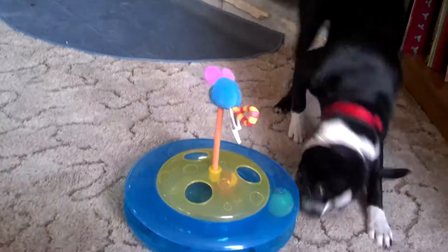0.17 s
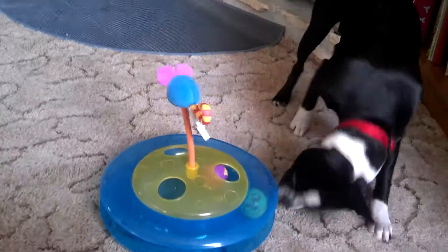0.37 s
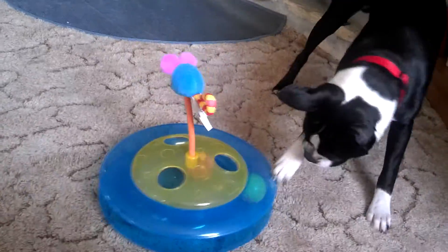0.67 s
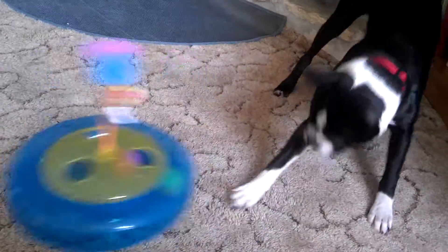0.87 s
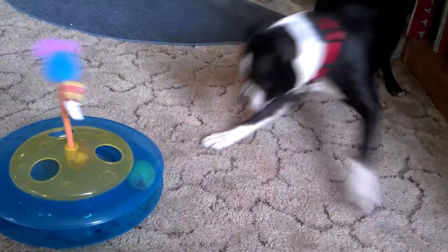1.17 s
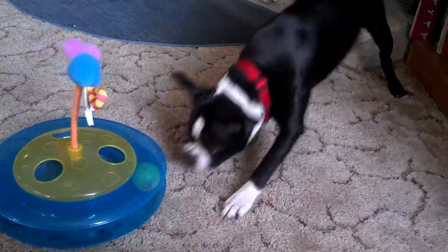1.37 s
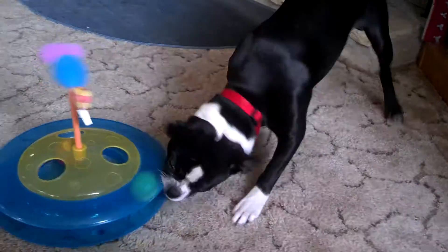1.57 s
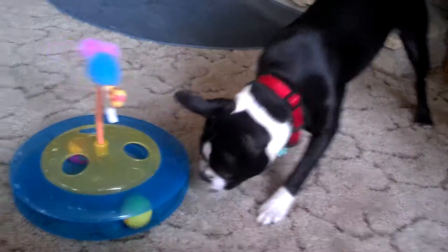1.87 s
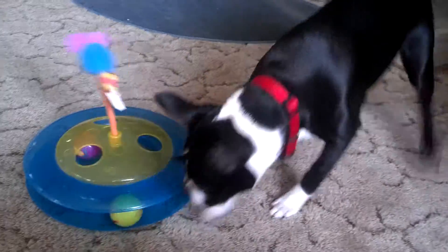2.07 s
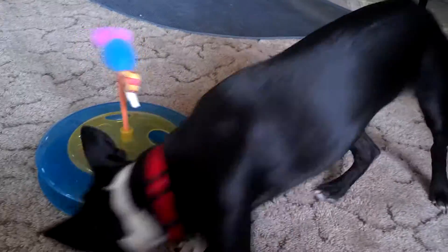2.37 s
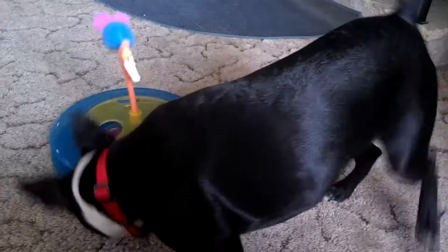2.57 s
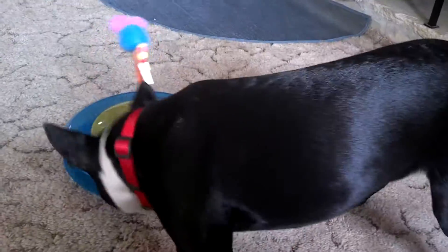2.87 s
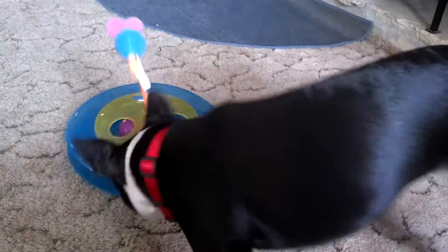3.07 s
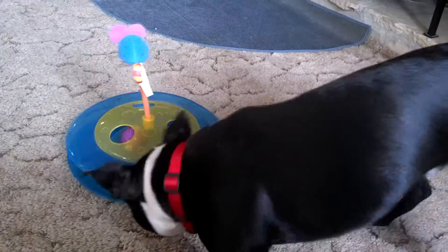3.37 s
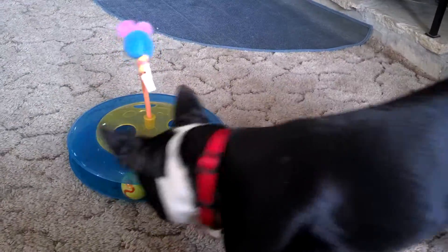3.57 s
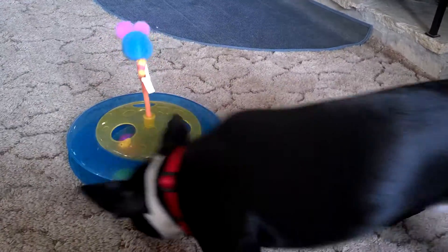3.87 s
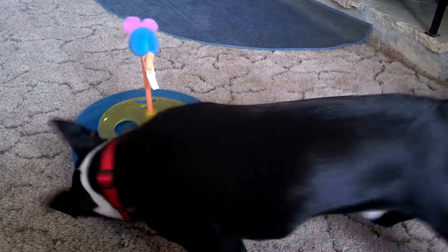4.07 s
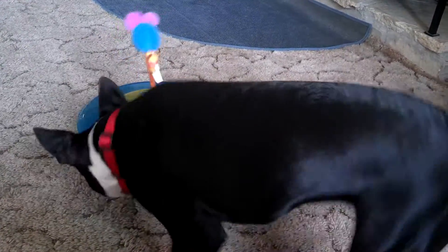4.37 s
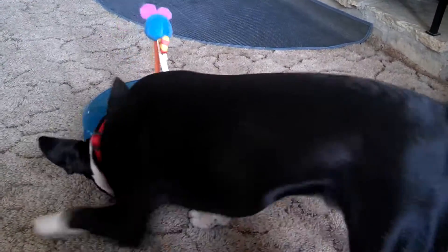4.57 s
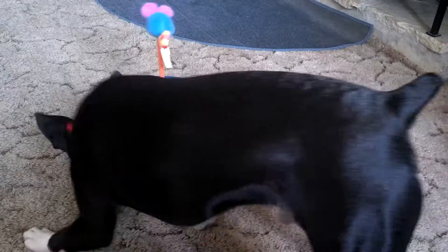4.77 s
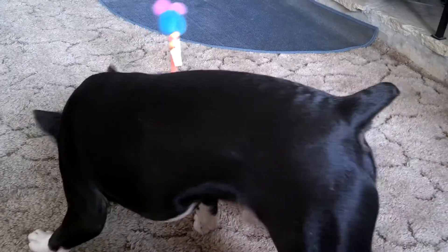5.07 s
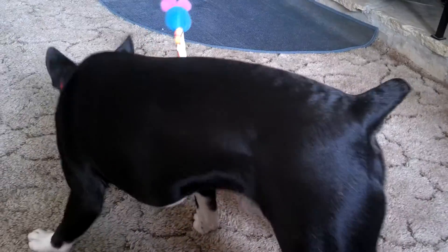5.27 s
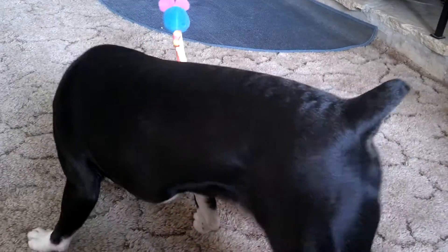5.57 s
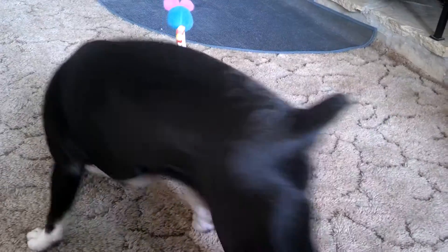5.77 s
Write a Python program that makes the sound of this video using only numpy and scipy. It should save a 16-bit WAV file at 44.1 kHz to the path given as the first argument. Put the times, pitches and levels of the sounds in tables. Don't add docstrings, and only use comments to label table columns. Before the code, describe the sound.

Hollow plastic clacks and short ball rumbles mix with bright collar tag jingles and light sniffs as a dog plays indoors.

```python
import sys
import numpy as np
from scipy import signal
from scipy.fft import rfft, irfft
from scipy.io import wavfile
from scipy.ndimage import uniform_filter1d

SR = 44100
rng = np.random.default_rng(int(sys.argv[2]) if len(sys.argv) > 2 else 0)


def boost(x):
    u = np.asarray(x, float) / 20
    return 10 ** u


def store_wav(level_fs):
    pcm = np.round(np.clip(np.atleast_2d(level_fs), -1, 1) * 32767)
    wavfile.write(sys.argv[1], SR, pcm.T.astype(np.int16))


N = 260631
FREQS = np.fft.rfftfreq(N, 1 / SR) + 1


def curve(table):
    s, *columns = np.transpose(table)
    return [np.interp(np.arange(N) / SR, s, c) for c in columns]


def over_hz(points):
    hz, value = np.transpose(points)
    return np.interp(np.log(FREQS), np.log(hz), value)


def walk(rate):
    hold = int(SR / rate)
    steps = np.repeat(rng.standard_normal(N // hold + 1), hold)
    return 1.25 * uniform_filter1d(steps, hold)[:N]


def rustle(points, grit_db, rate, patchy_db):
    grain_db = grit_db * rng.exponential(size=N)
    grains = rng.standard_normal(N) * boost(grain_db + patchy_db * walk(rate))
    x = irfft(rfft(grains) * boost(over_hz(points)), N)
    return x / np.std(x)


def ring(hz, db, t60, phase, rise):
    t = np.arange(SR // 4)[:, None] / SR
    decay = boost(db - 60 * t / np.clip(t60, .003, .5))
    modes = decay * (1 - np.exp(-t / rise)) * np.sin(2 * np.pi * hz * t + phase)
    return modes.sum(axis=1)


def burst(count, lo_hz, hi_hz):
    band = signal.butter(2, [lo_hz, hi_hz], "band", fs=SR, output="sos")
    return signal.sosfilt(band, rng.standard_normal((count, SR // 4)))


def add(track, s, sound):
    i = int(s * SR)
    track[i:i + len(sound)] += sound[:N - i]


def mains_hum():
    # time_s, level_db
    hum_level = [
        (0.0, -58),
        (0.26, -53.5),
        (1.45, -79),
        (3.08, -59.5),
        (3.24, -66),
        (3.47, -60),
        (5.91, -53.5),
    ]
    tone = np.sin(2 * np.pi * 119.5 * np.arange(N) / SR + 1.2 * walk(40))
    return tone * boost(curve(hum_level)[0] + 10 + 3.0 * walk(35))


def scuffing():
    # time_s, rumble_db
    push = [(0, -57.5), (.2, -51.5), (.5, -53), (.66, -62.5), (.8, -52), (1.02, -70), (1.22, -72.5),
            (1.6, -71.5), (1.97, -65.5), (2.43, -59.5), (2.63, -55.5), (2.78, -58), (3.11, -61.5),
            (3.57, -56), (3.85, -59.5), (4.23, -53.5), (5.55, -53), (5.91, -55.5)]
    # time_s, fur_hiss_db
    stir = [(0, -73), (.39, -57.5), (.52, -58), (.66, -81.5), (.79, -77.5), (1.1, -97), (1.33, -69),
            (1.51, -86), (1.97, -77.5), (2.43, -69), (2.75, -66.5), (3.11, -75), (3.6, -72.5), (4.08, -66),
            (5.2, -68), (5.33, -73), (5.68, -64), (5.91, -64.5)]
    # time_s, peak_db
    runs = [
        (0.519, -53.5),
        (0.869, -46.5),
        (2.632, -51),
        (4.23, -47.5),
        (4.54, -52),
        (5.199, -43),
        (5.55, -59.5),
    ]
    # frequency_hz, density_db
    rumble_colour = [(40, -4.5), (100, -2.5), (200, 1.5), (330, 2.5), (550, 0), (1100, -5.5), (2000, -13.5),
                     (3000, -33)]
    scrape_colour = [(1200, -28), (2200, 0.5), (3500, -2.5), (5000, -6), (7000, -12), (9000, -11),
                     (12000, -14), (16000, -23)]
    fur_colour = [(5000, -52), (7500, -9), (9000, -7.5), (11400, -0.5), (13000, -8.5), (15500, 1.5),
                  (17000, -40.5)]
    rise_db_s, fade_db_s = 125, 119.5
    t = np.arange(N) / SR
    (push_db,), (fur_db,) = curve(push), curve(stir)
    rolls = sum(boost(db - np.maximum(rise_db_s * (s - t), fade_db_s * (t - s))) for s, db in runs)
    rumble_level = np.hypot(boost(push_db - 1.5), rolls)
    rumble = rumble_level * rustle(rumble_colour, grit_db=2.5, rate=24, patchy_db=0.0)
    scrape_db = -70.5 + 0.9 * (push_db + 59)
    scrape = boost(scrape_db + 3) * rustle(scrape_colour, grit_db=1.5, rate=50, patchy_db=.8)
    fur = boost(fur_db + 1.5) * rustle(fur_colour, grit_db=1.5, rate=60, patchy_db=.8)
    return rumble + scrape + fur


def jingles():
    # time_s, tick_peak_db, ring_re_tick_db
    low_tag = [(.397, -42.5, 5), (1.479, -48, 0), (1.488, -53, 9), (2.0842, -43.5, -5), (3.009, -31.5, 7.5),
               (3.3705, -57, -11), (3.6736, -51, -8), (4.369, -39.5, -8), (4.3764, -41, -14),
               (4.415, -47, 0.5), (4.6616, -45.5, -6), (4.7314, -44.5, 6)]
    middle_tag = [(.501, -53, 17), (0.9466, -60, -10.5), (1.2416, -65.5, -7), (1.3152, -52.5, -6),
                  (1.5253, -45.5, -12), (1.793, -62, -8), (2.188, -62, 3), (2.2872, -57, -3),
                  (2.5038, -51, 0), (2.5122, -49, -1.5), (2.6195, -54.5, 7.5), (3.075, -36, -6),
                  (3.8464, -52, 2), (4.119, -31, -15), (4.4395, -47.5, 5), (4.4777, -64, 17.5),
                  (4.4929, -51.5, 11.5), (4.6952, -43, 3.5), (5.1765, -41, -9), (5.477, -54, 5),
                  (5.593, -41.5, 8), (4.7435, -56, 6), (5.601, -41, 13), (5.6096, -38.5, 2.5),
                  (5.7014, -48.5, 12)]
    high_tag = [(0.182, -43, 4.5), (0.3012, -30, -8), (0.3242, -27, -5), (0.4121, -36, -5),
                (0.548, -48, 15), (.749, -41.5, 1), (0.9365, -47, 1.5), (1.2944, -62, -4), (2.431, -46, -2),
                (2.74, -51, 11.5), (2.756, -56.5, 7), (2.995, -35, 6), (3.6894, -57.5, 17),
                (3.7425, -60.5, 25.5), (4.0798, -33, -31), (4.1355, -39, -2), (5.2958, -41.5, -6),
                (5.4936, -48.5, 10), (5.541, -43.5, 6), (5.55, -56, 17), (5.6887, -49.5, 3),
                (5.7615, -52, -7), (5.79, -38, 8), (5.8683, -50, 0), (5.7821, -33, -4)]
    # low_db, middle_db, high_db
    tags_along = [(-3, -16, -20), (-18, 3, -19), (-20, -18, 0)]
    # time_s, peak_db
    dry_ticks = [(0.2635, -27), (0.466, -36), (0.5649, -25), (0.6924, -28.5), (.7644, -32), (0.7867, -30.5),
                 (0.8032, -17), (0.817, -52), (.927, -61.5), (1.176, -66), (1.5855, -49), (1.6075, -57),
                 (1.546, -50), (1.5736, -56.5), (1.62, -54), (1.595, -38), (1.7091, -50.5), (2.776, -56),
                 (2.788, -39.5), (2.9396, -36), (3.346, -47.5), (3.384, -54), (4.6132, -51),
                 (4.9113, -47.5), (5.28, -38.5), (5.6839, -43.5)]
    dry_ring_db = -26.5
    hits = [(s, db, *[dry_ring_db] * 3) for s, db in dry_ticks]
    for tag, along in zip((low_tag, middle_tag, high_tag), tags_along):
        hits += [(s, db, *(ring_db + np.array(along))) for s, db, ring_db in tag]
    return sorted(hits)


def clinks():
    # frequency_hz, level_db, t60_s
    tag_modes = [(11350, 0, .035), (13065, -2, .048), (15270, -4, .04)]
    # frequency_hz, level_db, t60_s
    weak_modes = [(6300, -57, 0.059), (7200, -47, 0.014), (8190, -18, 0.054)]
    out, t = np.zeros(N), np.arange(SR // 4) / SR
    hz, db, t60 = np.transpose(tag_modes)
    weak_hz, weak_db, weak_t60 = np.transpose(weak_modes)
    hits = jingles()
    chance = rng.standard_normal((len(hits), 3 + len(weak_modes)))
    snaps, chatters = burst(len(hits), 7600, 21000), burst(len(hits), 36, 400)
    fast = (1 - np.exp(-t / 0.00095)) * boost(-60 * t / 0.0068)
    slow = boost(-60 * t / 0.087)
    for (s, peak_db, *tag_db), luck, snap, chatter in zip(hits, chance, snaps, chatters):
        tag_db = np.array(tag_db)
        ringing = db + tag_db - 0.99 * np.clip(-22.0 - tag_db, 0, 30)
        tags = ring(hz * (1 + 0.0022 * luck[:3]), ringing, t60 * boost(2 * luck[3:]), luck[:3], rise=0.0017)
        tags = tags + ring(hz * 1.009, ringing - 5, 0.49 * t60, 0, rise=0.0016)
        tags = tags + ring(weak_hz, ringing.max() + weak_db + 5 * luck[3:], weak_t60, 0, rise=0.00083)
        tick = snap * (boost(11.5) * fast + boost(-9.5) * slow)
        add(out, s, boost(peak_db + 1.5) * (tags * (1 + 0.9 * chatter) + tick))
    return out


def blows():
    # time_s, peak_db, brightest_hz, tilt_db_per_octave
    rim_hits = [(.225, -27.5, 448, -3.5), (.261, -30.5, 440, -4.5), (.317, -24, 507, 11.5),
                (0.324, -19.5, 517.5, 6.5), (0.71, -31, 530, 1), (.844, -34.5, 520, -3),
                (.935, -35.5, 430, 9), (1.291, -69.5, 630, -2.5), (1.545, -38, 441, 3.5),
                (1.5947, -32, 494, 2.5), (1.619, -37, 449, 4.5), (1.726, -44.5, 418, 1),
                (2.231, -45, 573, -7.5), (2.245, -54.5, 520, -11.5), (2.451, -32, 464, -0.5),
                (2.474, -40, 510, -6), (2.794, -44.5, 503, 0), (3.099, -27, 426, -3.5),
                (3.377, -47, 467, 1), (3.619, -30, 524, 11.5), (3.656, -38, 437, -12.5),
                (4.0726, -23, 450, -2.5), (4.146, -25, 804, -9.5), (4.163, -30, 560, 2),
                (4.2356, -29, 696, -4.5), (4.393, -50.5, 637, -1.5), (4.754, -33, 458, -4),
                (5.051, -36.5, 522, -3.5), (5.298, -30, 530, -2)]
    base_hits = [(.246, -31, 345, 3.5), (0.925, -38, 313, -3.5), (1.008, -44.5, 301, 1),
                 (1.179, -66, 336, -2), (1.869, -45, 338, 1.5), (2.2, -60, 295, -9.5),
                 (2.464, -37.5, 380, -2.5), (2.969, -26.5, 379, 3), (3.059, -25, 272, -3),
                 (3.366, -41, 385, 2.5), (3.641, -30, 332, -4), (3.839, -50, 335, 9),
                 (4.052, -30, 301.6, 9), (4.348, -29, 336, -5), (4.554, -43, 302, 11.5),
                 (4.641, -34.5, 301, -8.5), (4.778, -35.5, 329, 3), (4.905, -44, 350, 1),
                 (5.083, -39, 383, 2), (5.097, -38.5, 340, 4.5), (5.897, -38.5, 350, -6)]
    claw_hits = [
        (0.298, -39.5, 540, 16),
        (.564, -49, 1135, 11),
        (0.688, -46, 1107, 14),
        (0.787, -32.5, 1270, -12),
        (0.802, -26, 1105, -5),
        (2.939, -43, 880, -3),
        (5.789, -31.5, 1410, -2),
    ]
    ball_hits = [(0.764, -26, 1366, -3), (0.774, -38.5, 1247, 2), (0.819, -29, 1434, -12.5),
                 (1.523, -43.5, 1123, 9), (1.572, -38.5, 918, 11), (1.608, -41, 1023, 1.5),
                 (1.708, -46, 950, -3.5), (1.959, -50, 976, -9), (1.992, -45, 1030, -6),
                 (2.428, -39, 970, -9.5), (2.546, -31, 886, -6.5), (2.563, -31.5, 835, -6),
                 (2.6, -47, 950, -11), (2.988, -27, 917, 2.5), (2.9964, -12, 1093, -3.5),
                 (3.02, -20, 833, -8.5), (3.425, -44.5, 1096, -2.5), (3.443, -39.5, 1062, -3.5),
                 (3.474, -45.5, 850, -7), (4.119, -20.5, 815, -2.5), (4.968, -37.5, 850, -3),
                 (5.138, -32.5, 1153, -1.5), (5.177, -22, 966, -6), (5.188, -26, 1012, -8),
                 (5.278, -29, 888, 12.5), (5.761, -23, 843, -5), (5.778, -29, 930, 10)]
    crack_levels = [-19.5, -22.5, -25, -6]
    per_tilt, per_peak = 0.44, 0.069
    hits = []
    for kind, crack_db in zip((ball_hits, rim_hits, base_hits, claw_hits), crack_levels):
        for s, db, hz, tilt in kind:
            treble_db = crack_db + per_tilt * tilt + per_peak * (db + 37.5)
            hits.append((s, db, hz, treble_db, tilt))
    return sorted(hits)


def knocks():
    # frequency_hz, level_db, t60_share (of the blow's t60)
    shell_modes = [(234.2, -5.5, 2.38), (266, -12.5, 0.73), (336, -5, 3.1), (412, -2, 1.2), (520, 5, 1.12),
                   (660.2, 5, 1.74), (830, 5.5, 0.37), (850, -0.5, 0.23), (880, 7, 0.52), (1019, 5.5, 0.77),
                   (1259, 7, 0.53), (1470, -8, 0.78), (1568, -24.5, 0.09), (1800, -17, 0.51),
                   (2016, -4.5, 0.39)]
    out, t = np.zeros(N), np.arange(SR // 4) / SR
    hz, db, share = np.transpose(shell_modes)
    hits = blows()
    chance = rng.standard_normal((len(hits), 3, len(shell_modes)))
    rattles, cracks = burst(len(hits), 230, 1500), burst(len(hits), 2055, 3250)
    for hit, (size, detune, phase), rattle, crack in zip(hits, chance, rattles, cracks):
        s, peak_db, bright_hz, treble_db, tilt_db = hit
        off_peak_db = 7.3 * np.abs(np.log2(hz / bright_hz))
        colour = db + 0.94 * size - off_peak_db + tilt_db * np.log2(hz / 600)
        blow = ring(hz * (1 + 0.058 * detune), colour, 0.031 * share, 0.41 * phase, rise=0.72 / bright_hz)
        blow = blow / np.abs(blow).max() + ring(bright_hz, -6.5, 0.032, 0, rise=0.00056)
        slap_db = -10.5 + 4.5 * np.log2(min(bright_hz / 900, 1))
        blow = blow + ring(np.array([520, 900, 1350]), slap_db, 0.017, 0, rise=0.00046)
        blow = blow + rattle * boost(5.0 + tilt_db - 60 * t / 0.033) * (1 - np.exp(-t / 0.0079))
        crack_decay = boost(treble_db + 18.0 - 60 * t / 0.013) + boost(treble_db + 0.5 - 60 * t / 0.15)
        blow = blow + crack * (1 - np.exp(-t * bright_hz / 0.12)) * crack_decay
        add(out, s + 0.002002, blow * boost(peak_db + 2.0))
    return out


def afterrings():
    # time_s, peak_db, pitch_hz, t60_s
    panels = [(.229, -34.5, 473, 0.023), (.264, -22.5, 462, .03), (.3265, -19, 511, 0.1),
              (.345, -29.5, 503, .1), (.398, -39.5, 517.7, 0.17), (.7125, -39.5, 502, 0.03),
              (1.5965, -34.5, 520, .02), (2.971, -24, 620, 0.0079), (3.033, -29.5, 806, .03),
              (3.075, -26.5, 1363, 0.022), (3.446, -35, 1013, 0.028), (3.621, -28.5, 797, 0.01),
              (3.631, -30, 1084, 0.017), (3.654, -35.5, 426, 0.039), (4.0742, -8, 801, 0.0076),
              (4.1205, -22.5, 824.6, 0.066), (4.237, -26, 926, 0.015), (.2635, -38.5, 1300, .012),
              (.24, -36, 1250, .03), (.7642, -24, 1300, .009), (.767, -29.5, 420, 0.028),
              (.7745, -31.5, 1250, 0.0098), (.787, -29.5, 1300, .02), (.8035, -18, 1250, 0.0073),
              (.806, -30, 400, .02), (.8185, -24, 1100, 0.012), (.828, -32, 1400, 0.014),
              (.846, -34.5, 500, .025), (.869, -33, 500, 0.022), (2.5465, -25, 893, 0.018),
              (2.5645, -28, 840, 0.022), (2.601, -36.5, 930, 0.017), (3.0225, -15.5, 830, 0.015),
              (3.061, -22.5, 700, 0.0085), (4.641, -31.5, 330, 0.023), (4.765, -33, 700, 0.017),
              (5.1, -39, 1050, .03), (5.141, -28.5, 1300, .01), (5.151, -38, 1200, 0.023),
              (5.198, -28.5, 1050, .015), (5.29, -32.5, 1400, .02), (2.9972, -32, 3600, .012),
              (3.0055, -34, 3500, .015), (3.621, -42, 4300, .02), (1.8715, -48, 330, .1),
              (1.993, -42, 1040, .015), (2.004, -48, 1040, .015), (2.433, -36, 800, .015),
              (.9265, -40, 1900, .01), (.3, -36, 2200, .01), (5.477, -51.5, 7360, 0.047),
              (5.595, -55, 7080, 0.075), (5.69, -62, 6720, 0.11)]
    # time_s, peak_db, t60_s
    brittle = [(0.3, -36.5, .02), (.317, -32.5, 0.033), (1.5244, -45.5, .015), (1.5458, -49.5, .03),
               (1.5743, -49.5, .02), (1.5943, -36.5, 0.018), (1.6075, -60, 0.017), (1.6194, -47, 0.014),
               (1.7101, -47.5, .015), (2.9389, -30.5, 0.014), (2.9707, -43, 0.041), (2.9979, -32.5, 0.0092),
               (3.012, -36, .3), (3.6189, -38.5, 0.034), (3.635, -54.5, 0.05), (4.1206, -52, 0.12),
               (5.1799, -46, 0.031), (5.2801, -44, .04), (5.7702, -41, 0.023), (5.782, -51.5, 0.03),
               (5.795, -46.5, 0.126)]
    out, t = np.zeros(N), np.arange(SR // 4) / SR
    for s, db, hz, t60 in panels:
        add(out, s, ring(hz, db + 2.5, t60, 0, rise=.9 / hz))
    for (s, db, t60), snap in zip(brittle, burst(len(brittle), 2600, 4200)):
        add(out, s, snap * boost(db + 10.5 - 60 * t / t60) * (1 - np.exp(-t / 0.001)))
    return out


def sniffs():
    # start_s, end_s, whistle_hz
    spans = [
        (.41, .575, 3500),
        (4.765, 4.9, 3650),
        (4.46, 4.56, 2400),
        (2.645, 2.885, 3800),
        (3.5, 3.6, 4000),
        (2.99, 3.09, 3600),
        (4.075, 4.17, 6000),
    ]
    # hiss_re_whistle_db, level_db
    levels = [(-4, -42.5), (-20.5, -61), (-19, -56), (0, -58), (5, -59.5), (-7.5, -44.5), (-6, -48)]
    out, t = 0, np.arange(N) / SR
    for (start, end, hz), (hiss_db, db) in zip(spans, levels):
        breath = np.clip((t - start) / .015, 0, 1) * np.clip((end - t) / .035, 0, 1)
        nose = [(900, hiss_db - 10), (.9 * hz, hiss_db), (hz, 0), (1.1 * hz, hiss_db),
                (9000, hiss_db - 3), (16000, hiss_db - 5)]
        out = out + breath * boost(db) * rustle(nose, grit_db=2.2, rate=45, patchy_db=2.5)
    return out


def paw_falls():
    # time_s, peak_db, pitch_hz
    thuds = [
        (2.145, -68.5, 152),
        (3.537, -52, 145),
        (4.567, -63, 153),
        (4.66, -57, 72.4),
    ]
    out = np.zeros(N)
    for s, peak_db, hz in thuds:
        add(out, s, ring(hz, peak_db + 29, 0.143, 0, rise=0.011))
    return out


def room(x):
    t60_s, level_db = 0.27, -10
    low_hz, top_hz = 520, 4300
    t = np.arange(SR // 2) / SR
    tail = rng.standard_normal(len(t)) * boost(-60 * t / t60_s) * (t > .004)
    tail = signal.lfilter(*signal.butter(1, [low_hz, top_hz], "band", fs=SR), tail)
    return signal.fftconvolve(x, boost(level_db) * tail / np.linalg.norm(tail))[:N]


def scene():
    hits = knocks() + clinks() + afterrings()
    heard = hits + room(hits) + scuffing() + sniffs() + mains_hum() + paw_falls()
    return np.tile(heard, (2, 1))


def widen(one, direct):
    # frequency_hz, turn_rad
    bass_turn = [(40, 1), (110, 2.54), (200, 1.22), (450, 0.78), (690, 2.32)]
    lag = 16
    turn = np.where(FREQS < 730, over_hz(bass_turn), np.pi - 2 * np.pi * FREQS * lag / SR)
    even = np.cos(turn / 2)
    odd = -1j * np.sin(turn / 2) * np.tanh((FREQS - 730) / 90)
    mid, side = irfft(one * even, N), 0
    depth = np.where(FREQS > 1000, np.minimum(np.abs(even), np.abs(odd)), 1)
    rim_share = np.clip((.48 + FREQS / 90000 - depth) / .08, 0, 1)
    treble = np.abs(np.diff(direct, prepend=0))
    calm = np.clip(6 - 2.6 * uniform_filter1d(treble, 500) / uniform_filter1d(treble, 3000), 0, 1)
    for band in range(lag * 3 // 4 + 1):
        overlap = np.clip(3 - 5 * np.abs(FREQS * lag * 2 / SR - band), 0, 1)
        flip = np.tanh(14 * (walk(18) + 0.31))
        core, rim = (np.clip(6 * (walk(30) + bias), 0, 1) for bias in (2.2, .8))
        core = core * calm
        weaker = one * overlap * (odd if band % 2 else even)
        hole = core * irfft(weaker * (depth < .24), N)
        hole = hole + core * rim * irfft(weaker * (depth >= .24) * rim_share, N)
        side = side + flip * irfft(one * odd * overlap, N)
        if band % 2:
            side = side - flip * hole
        else:
            mid = mid - hole
    return [mid + side, mid - side]


def roll_off(x):
    return signal.sosfilt(signal.butter(12, 16950, fs=SR, output="sos"), x)


def record(dry):
    # frequency_hz, level_db
    mic_response = [(20, -30), (60, -16), (130, -11), (250, 1.5), (15750, -1), (15950, -21), (16600, -30.5),
                    (17200, -67)]
    # frequency_hz, left_minus_right_db
    side_balance = [(100, -0.5), (350, 2), (800, 1.5), (1300, 0.8), (1800, -4.5), (2300, -3)]
    one = rfft(dry[0]) * boost(over_hz(mic_response))
    sides = widen(one, dry[0])
    balance_db = over_hz(side_balance) * np.clip((2600 - FREQS) / 300, 0, 1)
    tilt = boost(np.array([[.5], [-.5]]) * balance_db)
    mix = irfft(rfft(sides) * tilt, N)
    return roll_off(mix)


dry = scene()
out = record(dry)
store_wav(out)
```